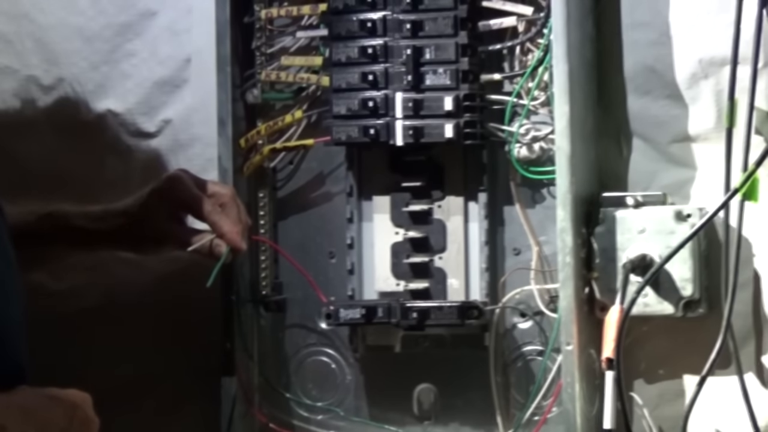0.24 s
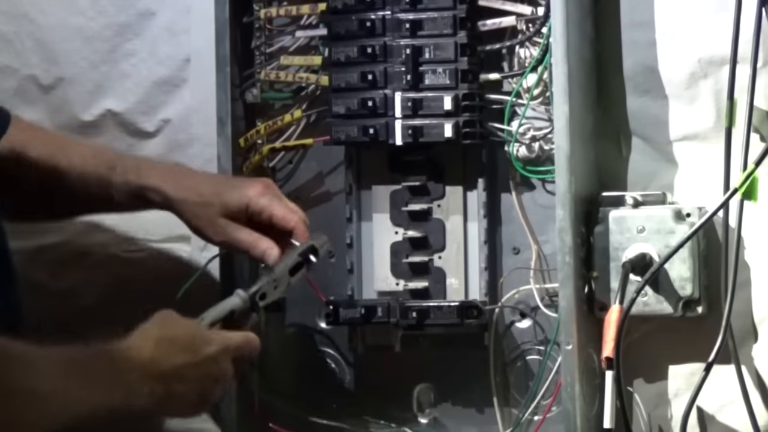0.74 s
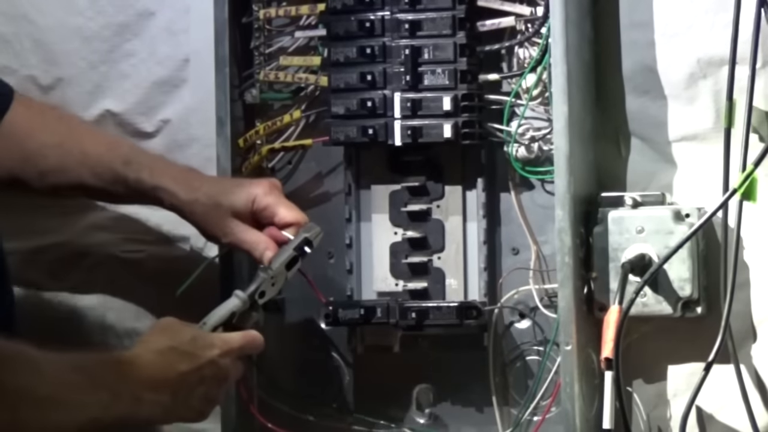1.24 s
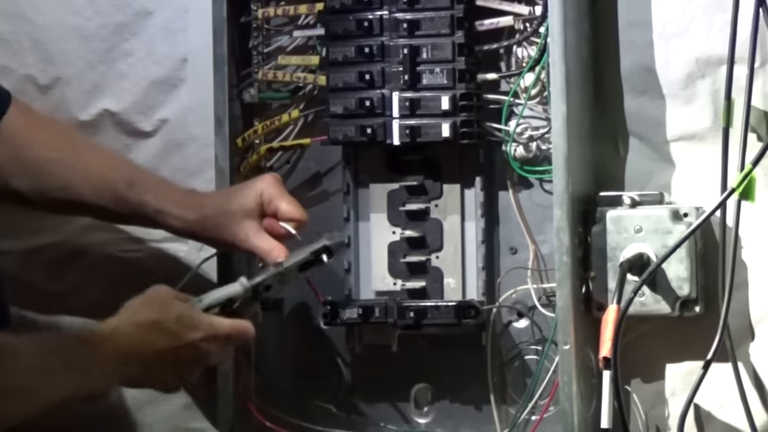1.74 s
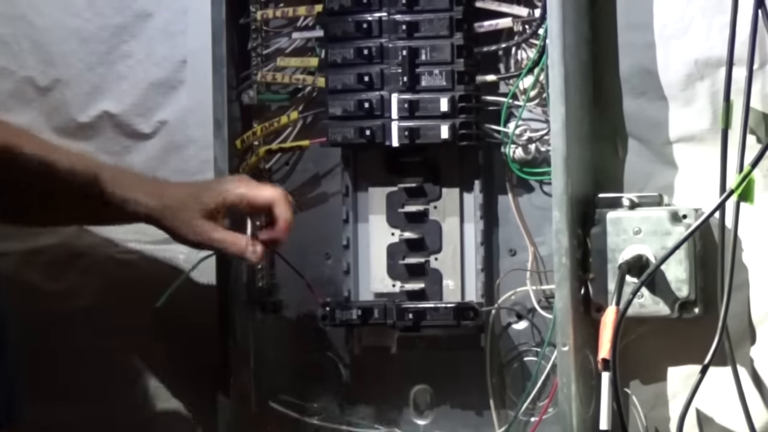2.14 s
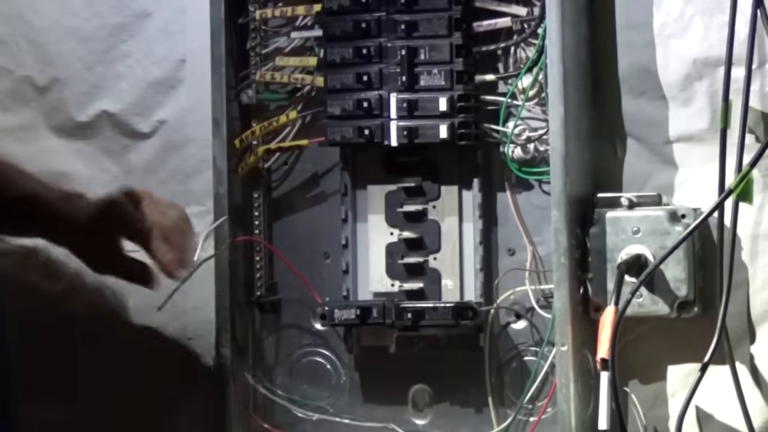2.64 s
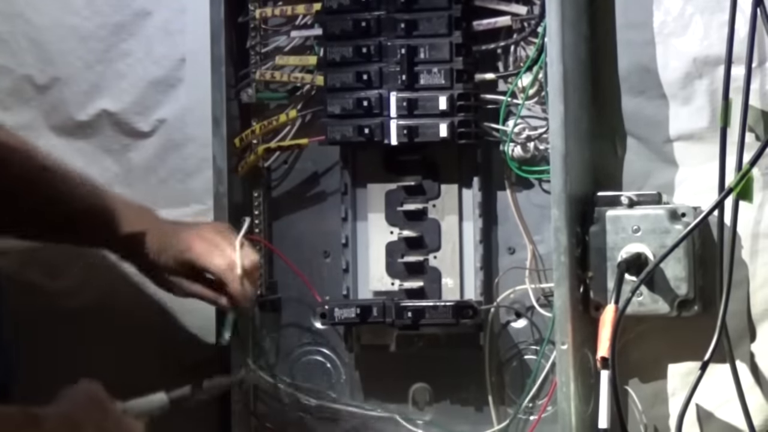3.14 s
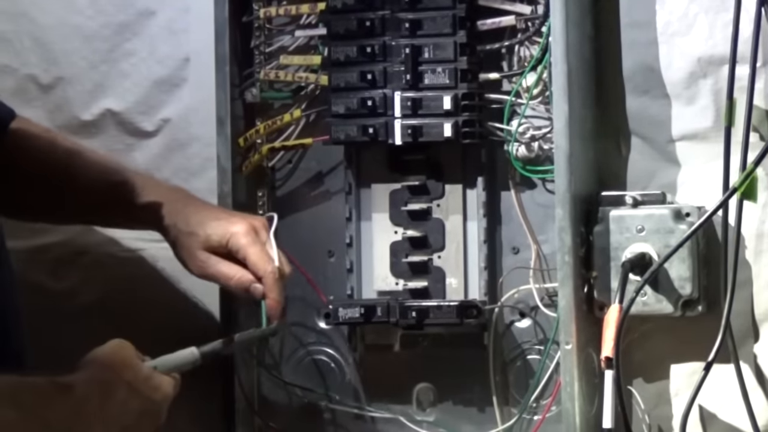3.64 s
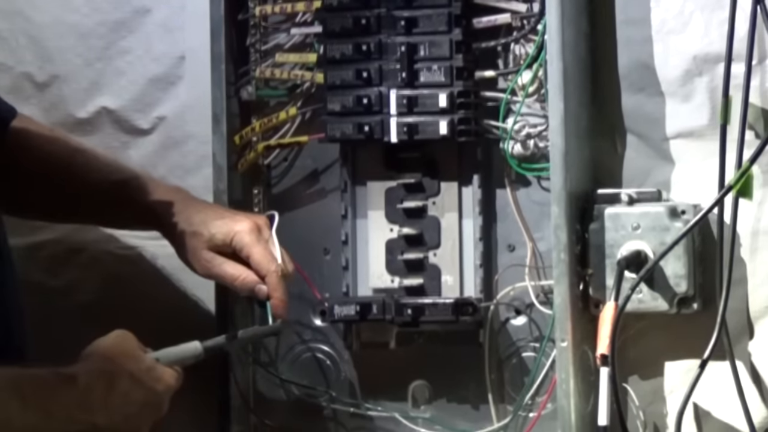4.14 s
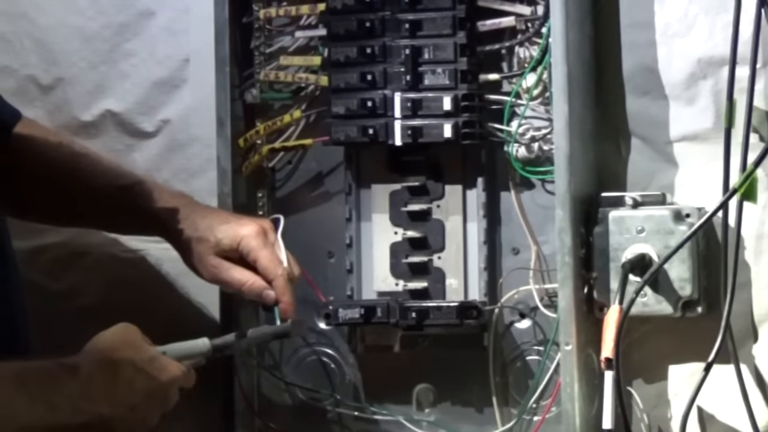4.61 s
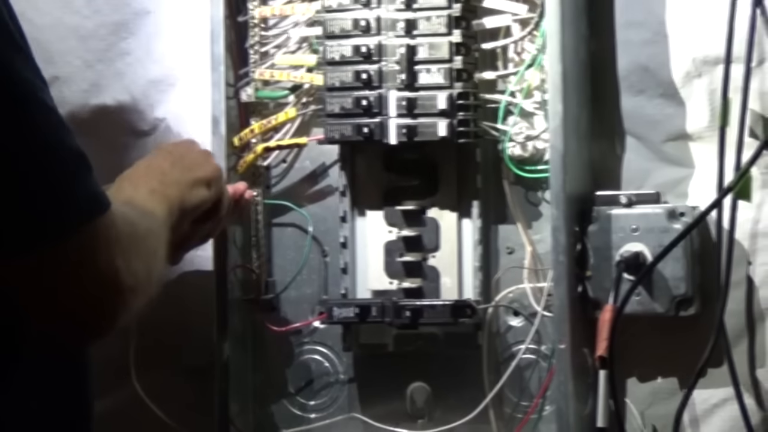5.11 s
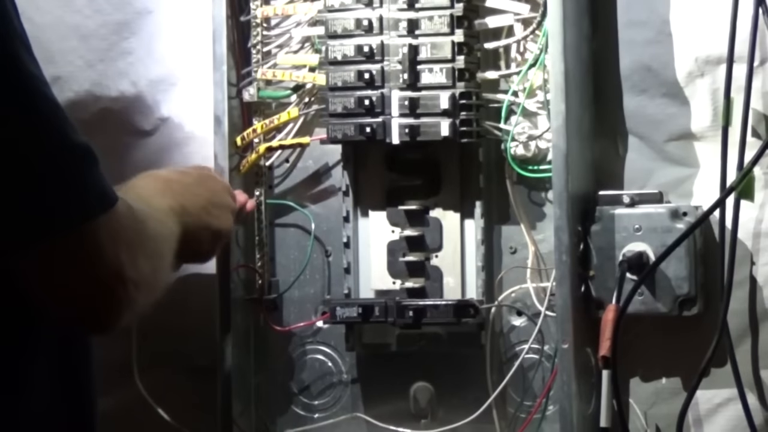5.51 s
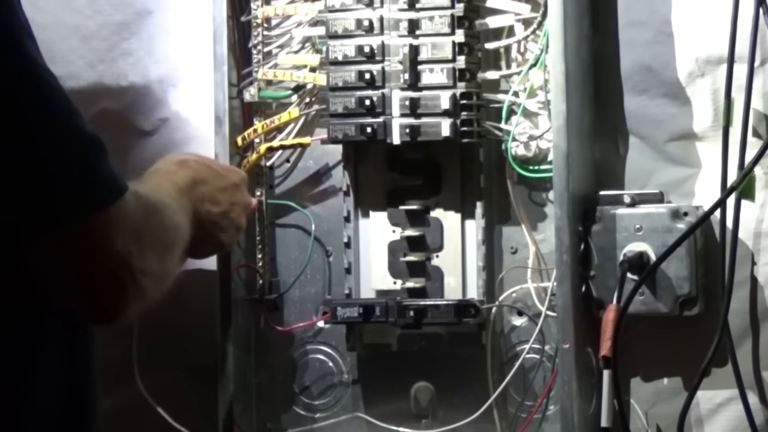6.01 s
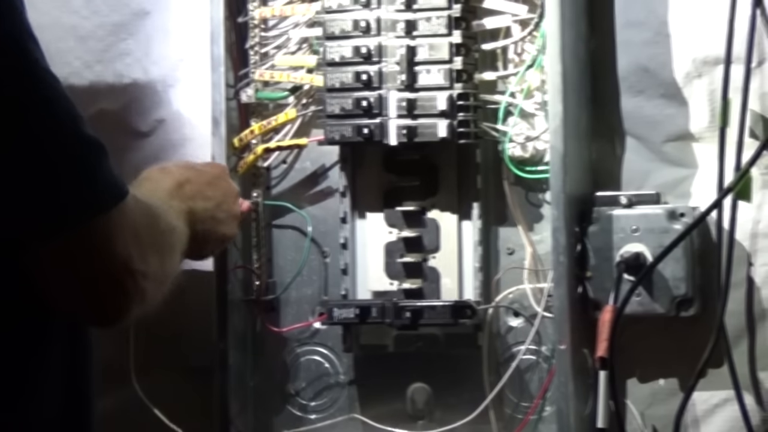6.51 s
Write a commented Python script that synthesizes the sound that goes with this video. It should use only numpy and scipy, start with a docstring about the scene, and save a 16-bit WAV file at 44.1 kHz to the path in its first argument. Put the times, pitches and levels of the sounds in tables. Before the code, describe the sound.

Small dry plastic ticks and soft thumps, then wire strippers click and clatter sharply by a metal panel, settling into faint handling taps over hiss.

```python
"""Dry creaking ticks and soft thumps are heard first, close to the microphone: plastic slips and a pushed
housing. Then wire strippers and wire ends clatter on a steel panel in a bare room, as impact clusters exciting
modes. Hands and sleeves rub as dense grains; a small mechanism ticks some 30 times a second, with one rest
marked by a click as it stops and starts, as two beating modes. Shaped noise makes the room tone. The level dips
to silence and back twice."""
import sys
import numpy as np
from scipy import signal
from scipy.fft import rfft, irfft, next_fast_len
from scipy.io import wavfile
from scipy.ndimage import uniform_filter1d

SR = 44100
rng = np.random.default_rng(int(sys.argv[2]) if len(sys.argv) > 2 else 0)


def bounce(signal):
    """Save signal as a 16-bit WAV file at the path given by the first command-line argument."""
    frames = np.transpose(np.atleast_2d(signal))
    limited = np.clip(frames, -1, 1)
    pcm = np.round(limited * 32767).astype(np.int16)
    wavfile.write(sys.argv[1], SR, pcm)


def invert_db(x):
    """Field ratio 10**(x/20) for x, a level in decibels (scalar or array-like)."""
    u = np.asarray(x, float) / 20
    return 10 ** u


N = 298116  # length in samples


def evened(x):
    """Power normalisation: scales to rms 1."""
    return x / np.sqrt(np.mean(x ** 2) + 1e-20)


def levelled(x, db):
    """Short-time level: scales so that the loudest 3 ms have this rms level."""
    return invert_db(db) * x / np.sqrt(uniform_filter1d(x ** 2, size=132).max())


def read(points, hz):
    """Logarithmic pitch scale: reads a spectrum table along log frequency."""
    f, value = np.transpose(points)
    return np.interp(np.log(hz + 1), np.log(f + 1), value)


def add(mix, s, sound):
    """Superposition: mixes a sound in at time s."""
    part = mix[max(round(s * SR), 0):][:len(sound)]
    part += sound[:len(part)]


def colour(points, size=2048):
    """Minimum phase: the causal impulse response whose phase follows from its log gain."""
    hz = abs(np.fft.fftfreq(size, 1 / SR))
    log_gain = np.log(invert_db(read(points, hz)))
    response = np.exp(np.conj(signal.hilbert(log_gain)))
    return np.fft.ifft(response).real[:size // 2]


def ring(hz, t60, size=8000):
    """Damped free vibration: a sine dying by 60 dB in t60."""
    t = np.arange(size) / SR
    return invert_db(-60 * t / max(t60, .003)) * np.sin(2 * np.pi * hz * t)


def contact(t60, rise, spread_db, lead_db):
    """Rough contact: a leading impact among tiny uneven ones that swell for a moment and die."""
    t = np.arange(6000) / SR
    rise = max(rise, .0002)
    impacts = rng.standard_normal(len(t))
    impacts *= invert_db(spread_db * np.minimum(rng.exponential(1, len(t)), 4))
    clumps = evened(uniform_filter1d(rng.standard_normal(len(t)), size=200))
    impacts *= invert_db(2.92 * clumps)
    impacts[round(rise * SR)] = invert_db(lead_db)  # at the crest of the swell
    swell = np.minimum(t / rise, 1)
    decay = invert_db(-60 * np.maximum(t - rise, 0) / max(t60, .001))
    return impacts * swell * decay


# Blows and scrapes of tool and wire, levels as loudest 3 ms before room and microphone:
# t/s, level/dB, bass tilt/dB, treble tilt/dB, contact t60/s
BLOWS = [(.866, -61, 7, -14, 0.065), (1.134, -53.5, -4.5, -18, 0.046), (1.711, -47, 2.5, -18, 0.082),
         (1.725, -38, -0.5, -5.5, 0.069), (1.759, -46.5, -4.5, -21, .05), (1.815, -54, -2, -28, 0.16),
         (1.909, -65.5, 12, -18, 0.088), (2.054, -59.5, 0, -43, 0.18), (2.098, -45.5, -8, -8, 0.04),
         (2.124, -39.5, -2.5, -0.5, 0.022), (2.167, -48, -4, -10, 0.11), (2.257, -46, -2, -8.5, 0.086),
         (2.325, -48, 0, -9.5, 0.049), (2.382, -22, -9.5, -6, 0.055), (2.44, -38.5, 2.7, -5.5, .13),
         (2.493, -32, -5, -7.5, 0.092), (2.981, -45, -6, -5, 0.078), (3.055, -42, -8, -6.5, 0.064),
         (3.072, -52.5, 16, -15, 0.17), (3.137, -50, -3, -9, 0.088), (3.159, -36, -13, -7.5, 0.066),
         (3.168, -36, -4, -5, 0.13), (3.18, -25, -3, 9.5, 0.065), (3.193, -24.5, -4.5, 4, 0.067),
         (3.21, -31.5, 4.7, -4, 0.068), (3.23, -29, -10, 4, 0.1), (3.385, -52, -5, -12.5, 0.075),
         (3.929, -64, 0, -29, 0.15), (3.975, -62, 13, -19, 0.044), (4.122, -73, 4, -29, 0.034),
         (4.5219, -40.5, -26, 11.5, 0.008), (4.611, -59, -9, 6, .017), (4.999, -59, 4.5, -16, 0.1),
         (5.178, -60, 11.5, -17, 0.09), (5.296, -38, -37, 8.5, 0.042), (5.383, -49.5, -9, 6.5, 0.042),
         (5.567, -60, 11, -15, 0.038), (5.586, -56, 5, -13, .2), (5.615, -57, -23, 16, .04),
         (5.637, -59, 10, -9, 0.087), (5.792, -61.5, 4.5, -21, 0.063), (5.91, -52.5, 5.5, -28, 0.14),
         (6.196, -51, 3.5, -14, 0.09), (6.227, -55, -13, 14, .06), (6.398, -62, 3, -29, 0.22),
         (6.543, -57.5, 19, -20, 0.17), (6.629, -58, 11, -32, 0.031)]
# Modes of tool and panel: f/Hz, relative level/dB, t60/s
STEEL_MODES = [(1635, 2.5, 0.09), (2010, -4, 0.021), (2480, -5.5, 0.27), (2794, 3.5, 0.024),
               (3200, -13, 0.12), (3730, 9, 0.024), (4080, -27, 0.015), (4680, 6, .05), (5150, 0, 0.01),
               (5970, 2, 0.048), (7960, -4, 0.054), (9260, 5.5, 0.045)]


def clatter():
    """Modal radiation: each contact radiates broadly and rings a changing share of the steel modes."""
    rise_share, longest_rise_s = .065, 0.009  # a long scrape swells more slowly than a short blow
    modes_db = -15.5  # modal energy over the direct blow
    out = np.zeros(N)
    for s, db, bass_db, treble_db, t60 in BLOWS:
        shares, detune = rng.standard_normal((2, len(STEEL_MODES)))
        modes = np.zeros(4000)
        for (hz, mode_db, mode_t60), share, off in zip(STEEL_MODES, shares, detune):
            modes += invert_db(mode_db + 3.5 * share) * ring(hz * (1 + 0.034 * off), mode_t60, size=4000)
        modes *= invert_db(modes_db) / np.linalg.norm(modes)
        modes[0] = 1  # the blow itself
        body = colour([(130, bass_db - 19), (280, bass_db - 1.0), (600, bass_db + 5.5),
                       (1000, 0.85 * bass_db + 0.5), (1600, 0.027), (3000, 0.0045),
                       (4800, 0.34 * treble_db + 3.0), (6500, 0.49 * treble_db), (9000, treble_db)])
        rise = min(rise_share * t60, longest_rise_s)
        impacts = contact(t60, rise, spread_db=2.5, lead_db=6)
        blow = signal.fftconvolve(impacts, modes)
        add(out, s, levelled(signal.fftconvolve(blow, body), db))
    return out


# Dry ticks by the microphone, levels as loudest 3 ms before room and microphone:
# t/s, level/dB, treble tilt/dB, rise/s, ring f/Hz
DRY_TICKS = [(0.0102, -43, -29, 0.0016, 1250), (.035, -54.5, -32, 0.0042, 1140),
             (.075, -53, -40, 0.00065, 1500), (.098, -35.5, -19.5, 0.0044, 1200),
             (.106, -42, -27, 0.0015, 1130), (0.1323, -30, -27, 0.00027, 3020), (.205, -65, -23, .003, 1390),
             (0.225, -54, -8, 0.0018, 1500), (0.232, -52.5, -6, 0.0027, 3200), (0.257, -57, -34, 0.0016, 1340),
             (0.281, -43, -9.5, 0.01, 1960), (.29, -33, -10.5, 0.0008, 1670), (.333, -53, -10, 0.00078, 2190),
             (.402, -55.5, -30, 0.0016, 774), (3.87, -56, -4, .0015, 3450), (4.035, -61, -45, .001, 1900),
             (4.078, -60, -45, .001, 1900), (4.098, -60, -45, .001, 1900), (4.221, -43.5, -23.5, 0.0036, 1310),
             (4.269, -53, -23, 0.002, 3530), (4.283, -49, -14.5, 0.002, 3050), (4.54, -38, -6.5, .0026, 1630),
             (4.656, -62.5, -31, 0.0013, 1310), (4.737, -58, -50, .003, 1400), (6.456, -59, -22, 0.0014, 3340)]


def creaks():
    """Stick-slip friction: plastic slips in a few sharp ticks, each with a very short ring; the ticks at 3.87 s
    and 6.456 s are clicks of the mechanism as it stops and starts again."""
    slip_t60_s, t60_per_rise = 0.024, 4.2  # a slow slip also dies more slowly
    out = np.zeros(N)
    for s, db, treble_db, rise, hz in DRY_TICKS:
        body = invert_db(-23.5) * ring(hz, 0.0083)
        body[:1024] += colour([(250, -17.5), (600, 0), (hz, 9), (hz + 2200, 2.5 + 0.24 * treble_db),
                               (6000, 0.49 * treble_db), (9000, treble_db)])
        lead_db = 22 - 4000 * rise  # a sudden slip is one crack, a slow one a cluster
        slip = contact(slip_t60_s + t60_per_rise * rise, rise, spread_db=0.5, lead_db=lead_db)
        add(out, s, levelled(signal.fftconvolve(slip, body), db))
    return out


# Low pushes on the housing, level before rise, decay and high-pass:
# t/s, level/dB, f/Hz, cycles within the push's t60, lasting ring over push/dB
PUSHES = [(0.101, -29, 234, 2, -39), (0.289, -38.5, 214, 2.4, -34), (1.147, -58, 282, 43, -44),
          (3.22, -72, 60, 5.8, -34), (4.222, -32.5, 225, 1.6, -42), (4.54, -47, 159, 3, -35),
          (5.76, -63, 75, 14, -40), (6.209, -67, 110, 12, -30), (6.41, -68, 108, 11, -30)]
# Low ring of the housing: f/Hz, t60/s
HOUSING_RING = (99, .4)


def thumps():
    """Forced then free vibration: a soft push dies away and the housing rings on after it."""
    out = np.zeros(N)
    t = np.arange(30000) / SR
    for s, db, hz, cycles, ring_db in PUSHES:
        push = ring(hz, cycles / hz, size=len(t)) * (1 - np.exp(-t * hz / (0.13 * cycles)))
        lasting = ring(*HOUSING_RING, size=len(t)) * (1 - np.exp(-t / 0.016))
        add(out, s, invert_db(db) * (push + invert_db(ring_db) * lasting))
    return signal.lfilter(*signal.butter(2, 55, "high", fs=SR), out)  # the lowest bass and any lasting offset fall away


# The mechanism rests: from t/s, to t/s (also stills the fizz in rustle)
REST = (3.835, 6.475)
# Dull rub of hands and sleeves on wire and plastic sheet, before room and microphone: t/s, level/dB
RUB_LEVEL = [(0, -65.5), (.2, -70), (.26, -64), (.4, -69.5), (.69, -65.5), (.8, -75.5), (.9, -67),
             (1.1, -73), (1.45, -73.5), (1.7, -69), (2.0, -70.5), (3.48, -68), (3.9, -70), (4.7, -74),
             (5.1, -74.5), (5.3, -68.5), (5.68, -70.5), (6.76, -74)]
# One airy swish: start t/s, attack/s, end of hold t/s, release/s, level/dB
SWISH_SHAPE = (.84, .04, 1.04, .05, -68)
# Colour of the swish: f/Hz, gain/dB
SWISH_COLOUR = [(1500, -22), (4000, -3), (6000, -1), (7500, -3), (9000, -1), (12000, -4)]


def rustle():
    """Granular friction noise: clumped grains make a dull rub and a bright fizz; plain noise one swish."""
    fizz_db = -77  # while the mechanism runs
    t = np.arange(N) / SR
    clumps_db = 2.25 * evened(uniform_filter1d(rng.standard_normal(N), size=900))
    grains = rng.standard_normal((2, N))
    grains *= invert_db(2.55 * np.minimum(rng.exponential(1, (2, N)), 5) + clumps_db)
    rub_colour = colour([(150, -14.0), (300, -2.5), (600, -0.5), (2500, -6.5), (6000, -18)])
    rub = evened(signal.fftconvolve(grains[0], rub_colour)[:N])
    fizz = evened(signal.fftconvolve(grains[1], colour([(2000, -1.0), (6000, -2), (9000, -13.5)]))[:N])
    airy = evened(signal.fftconvolve(rng.standard_normal(N), colour(SWISH_COLOUR))[:N])
    start, attack, end, release, swish_db = SWISH_SHAPE
    swish_gain = invert_db(swish_db) * np.interp(t, [start, start + attack, end, end + release], [0, 1, 1, 0])
    resting = uniform_filter1d(1. * (t > REST[0]) * (t < REST[1]), size=8000)
    fizz_gain = invert_db(fizz_db) * (1 - resting)
    rub_gain = invert_db(np.interp(t, *np.transpose(RUB_LEVEL)))
    return rub_gain * rub + fizz_gain * fizz + swish_gain * airy


# Two close modes that beat: f/Hz, relative level/dB, t60/s
TICK_MODES = [(3314, 15.5, 0.022), (3200, -3, 0.055)]


def ticking():
    """Beating of close modes: each step of the mechanism gives a short ring, uneven in strength."""
    first_s, gap_s = .0092, 1.001 / 30
    peak_db, spread_db = -59.5, 2.6  # usual peak of a tick and its random spread
    out = np.zeros(N)
    for s in np.arange(first_s, N / SR, gap_s):
        size_db, detune = rng.standard_normal(2)
        modes = sum(invert_db(db) * ring(hz + 20 * detune, t60, size=1200) for hz, db, t60 in TICK_MODES)
        burst = modes * (1 - np.exp(-np.arange(1200) / SR / 0.0021))
        if not REST[0] < s < REST[1]:
            add(out, s - .002, invert_db(peak_db + spread_db * size_db) * burst / abs(burst).max())
    return out


# Left-right difference of close sound: f/Hz, gain/dB
PORT_DIFFERENCE = [(150, -10), (400, 1.5), (3000, -0.5), (9000, -6.5), (13000, -20)]


def two_ports(x, side_db):
    """Phase quadrature: two ports hear close sound equally loud, their difference a quarter turn off."""
    size = next_fast_len(N)
    gain = invert_db(side_db + read(PORT_DIFFERENCE, np.fft.rfftfreq(size, 1 / SR)))
    side = irfft(1j * rfft(x, size) * gain, size)[:N]
    return x + np.outer([1, -1], side)


# Reverberation of the bare room: f/Hz, t60/s
ROOM_T60 = [(250, 0.51), (1000, 0.41), (3000, 0.3), (8000, 0.28), (14000, 0.17)]
# Left-right difference of the reverberation: f/Hz, gain/dB
ROOM_DIFFERENCE = [(100, -40), (1000, -9), (4000, -8.5), (8000, -7), (12000, -30)]


def room(x, wet_db):
    """Diffuse reverberation: sparse taps die by band; three tails take turns, seventeen times a second."""
    taps = np.zeros((6, SR))  # three common tails, then three that differ left to right
    at = np.arange(200, SR - 20, 20) + rng.integers(0, 20, (6, (SR - 201) // 20))
    np.put_along_axis(taps, at, rng.choice([-1., 1.], at.shape), 1)
    hz, t, z = signal.stft(taps, SR, nperseg=256)
    z = z * invert_db(-60 * t / np.maximum(read(ROOM_T60, hz), .05)[:, None])
    z[3:] *= invert_db(read(ROOM_DIFFERENCE, hz))[:, None]
    tails = signal.istft(z, SR, nperseg=256)[1]
    turn = 2 * np.pi * (17 * np.arange(N) / SR + np.arange(3)[:, None] / 3)
    shares = np.sqrt(2 / 3) * np.cos(turn / 2)  # their squares always sum to one
    fed = np.tile(x * shares, (2, 1))
    wet = signal.fftconvolve(fed, tails / np.linalg.norm(tails[0]), axes=1)[:, :N]
    common, difference = wet[:3].sum(0), wet[3:].sum(0)
    return invert_db(wet_db) * (common + np.outer([1, -1], difference))


# Spectrum of the room tone: f/Hz, relative density level/dB
TONE_SPECTRUM = [(15, -68), (25, -41), (153, -8), (242, -10), (301, -4), (531, -28), (754, -8.5),
                 (1040, -17.5), (1290, -11.5), (1400, -15), (4140, -11.5), (5280, -10), (11000, -12.5),
                 (13500, -11), (16000, -17.5)]
# Side over mid in the tone: f/Hz, ratio/dB
TONE_WIDTH = [(60, 3), (200, -12), (380, 4), (1000, 10.5), (2400, 4), (4400, -3), (8100, -12), (15000, -57)]
# Narrow hiss in the tone: f/Hz, distance to the 1/e gain points/Hz, level/dB
NARROW_HISS = (7880, 170, -86)


def room_tone():
    """Stationary noise: smooth wide hiss with faint drifting patches and one narrow band."""
    tone_db, patch_db = -68.5, 1.0  # rms levels of the hiss and of its drift
    frames, hz = N // 256 + 5, np.fft.rfftfreq(1024, 1 / SR)
    a, b, c, d, patches = rng.standard_normal((frames, 513, 5)).T
    patches = evened(uniform_filter1d(uniform_filter1d(patches, 12, 0), 14, 1))
    mid = a + 1j * b
    side = invert_db(read(TONE_WIDTH, hz))[:, None] * (c + 1j * d)
    z = mid + np.array([1, -1])[:, None, None] * side
    spectrum = invert_db(read(TONE_SPECTRUM, hz)[:, None] + patch_db * patches)
    hiss = signal.istft(z * spectrum, nperseg=1024, noverlap=768)[1]
    centre, width, narrow_db = NARROW_HISS
    band = np.exp(-((hz - centre) / width) ** 2)[:, None]
    narrow = signal.istft(z * band, nperseg=1024, noverlap=768)[1]
    return (invert_db(tone_db) * evened(hiss) + invert_db(narrow_db) * evened(narrow))[:, :N]


# Microphone response to sound through the air: f/Hz, gain/dB
MIC_RESPONSE = [(60, -13.5), (250, -3.5), (700, 0), (4500, 3.5), (6500, 3), (9000, 9.5), (11000, 0),
                (15000, -16)]


def scene():
    """Direct and reverberant fields: far sources fill the room, near ones hardly; the microphone colours both."""
    tools, hands, near = clatter(), rustle(), creaks()
    air = two_ports(tools, side_db=-12.5) + two_ports(hands + near, side_db=-4.0)
    air += room(tools + hands + invert_db(-19.5) * near, wet_db=-3)
    body = thumps() + two_ports(ticking(), side_db=-6.5)
    heard = signal.fftconvolve(air, colour(MIC_RESPONSE)[None], axes=1)[:, :N]
    return heard + body + room_tone()


def top_cut(x):
    """Nothing passes above the cut-off."""
    return signal.sosfilt(signal.butter(12, 16310, fs=SR, output="sos"), x)


# Brief dips of the level: fade starts t/s, silent t/s, back t/s
DIPS = [(0.701, 0.718, 0.752), (4.709, 4.723, 4.742)]


def record(dry):
    """Amplitude envelope: the whole sound fades out and in at each dip."""
    t = np.arange(N) / SR
    fades = np.prod([np.interp(t, dip, [1, 0, 1]) ** 1.43 for dip in DIPS], axis=0)
    return top_cut(dry * fades)


dry = scene()
out = record(dry)
bounce(out)
```